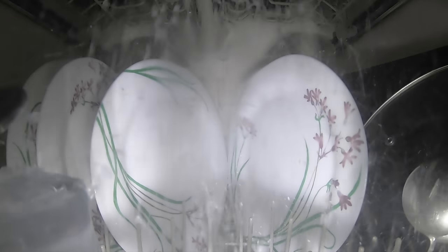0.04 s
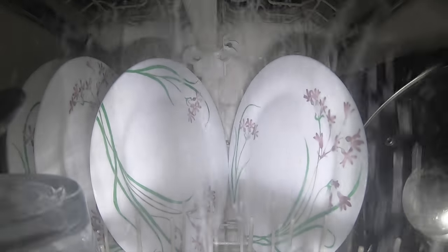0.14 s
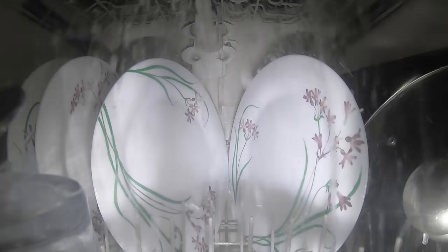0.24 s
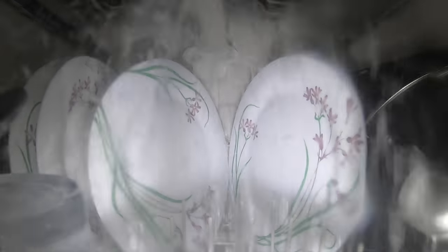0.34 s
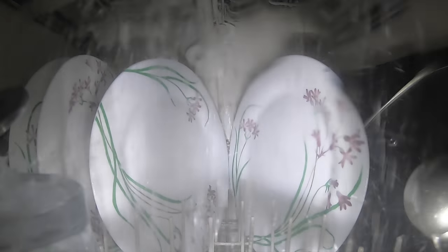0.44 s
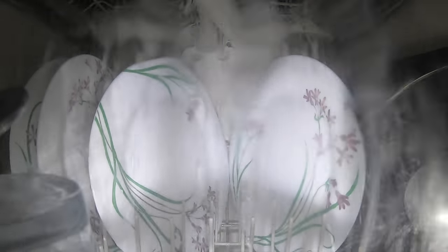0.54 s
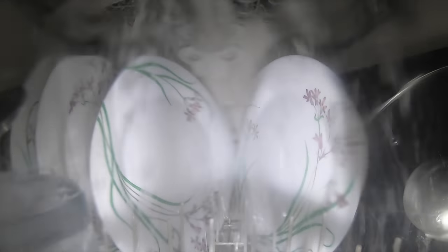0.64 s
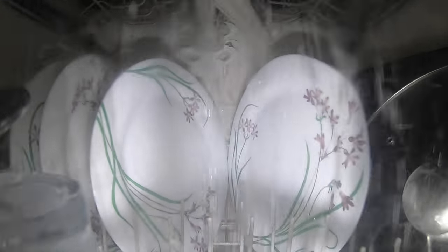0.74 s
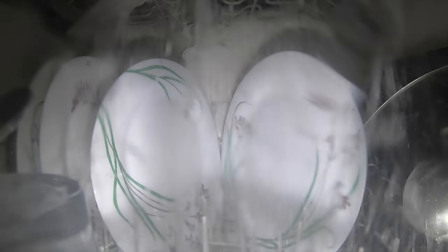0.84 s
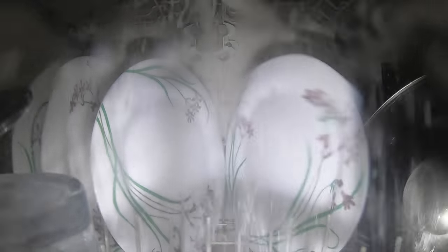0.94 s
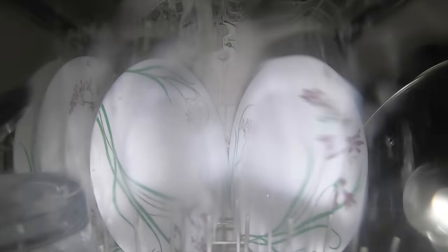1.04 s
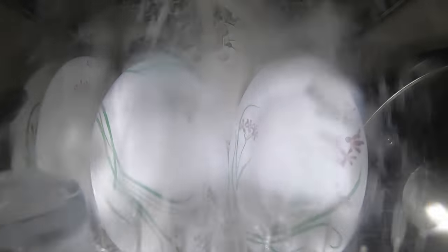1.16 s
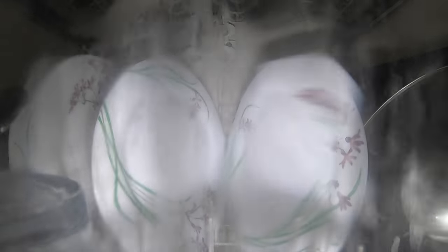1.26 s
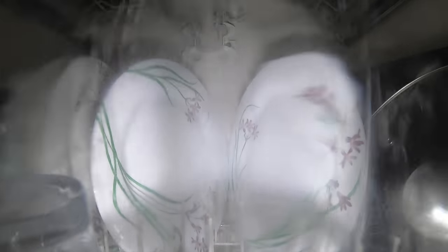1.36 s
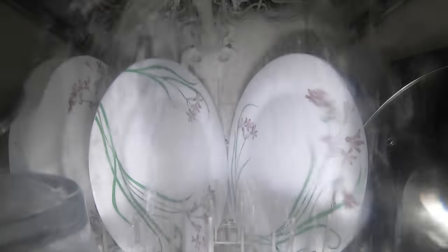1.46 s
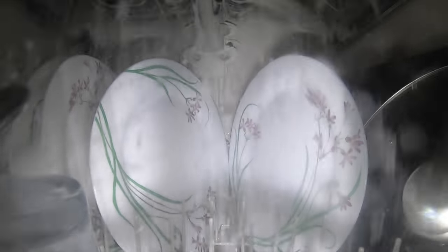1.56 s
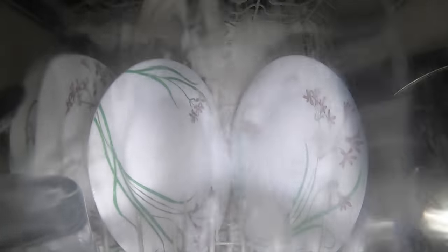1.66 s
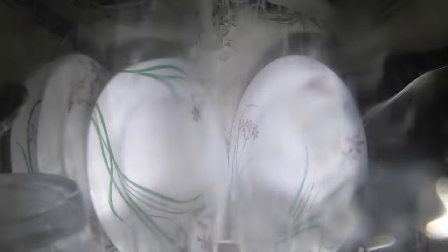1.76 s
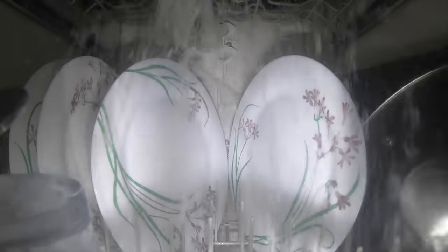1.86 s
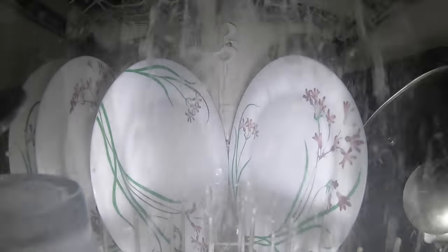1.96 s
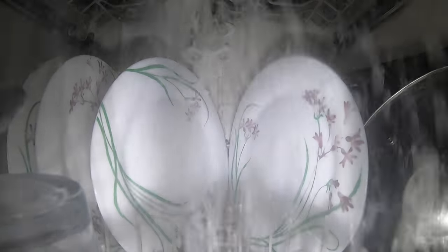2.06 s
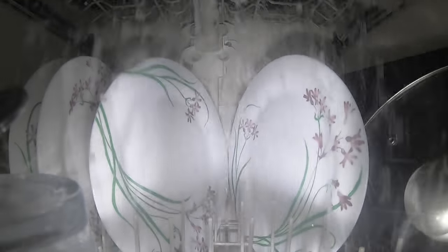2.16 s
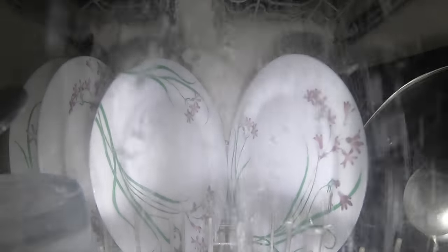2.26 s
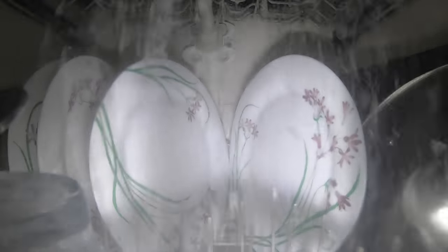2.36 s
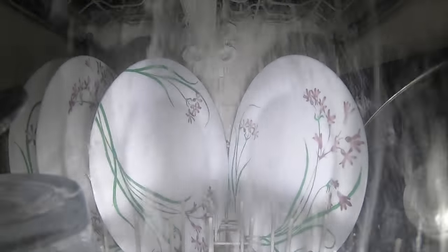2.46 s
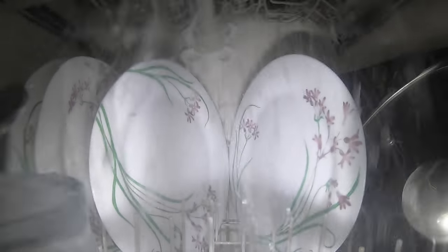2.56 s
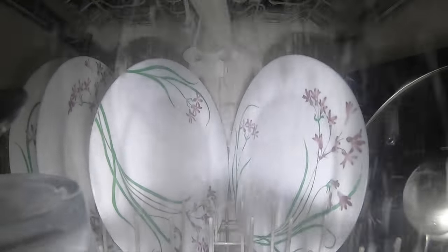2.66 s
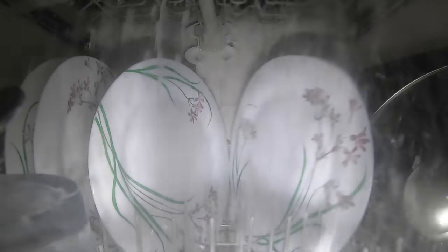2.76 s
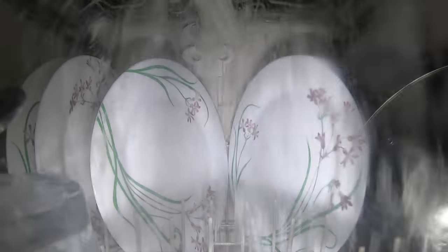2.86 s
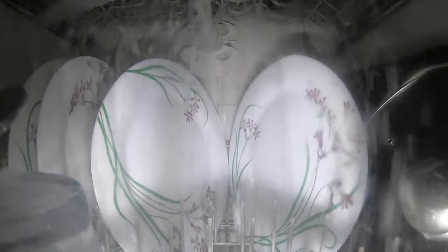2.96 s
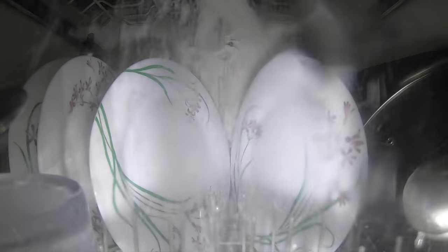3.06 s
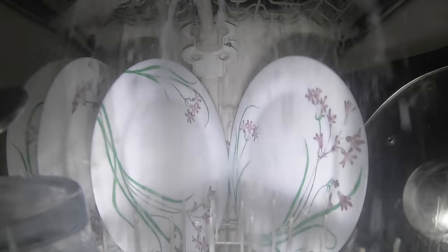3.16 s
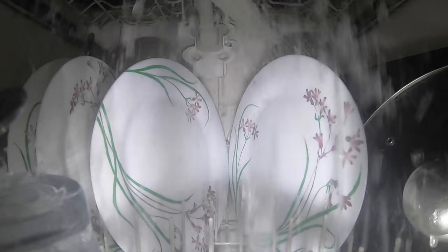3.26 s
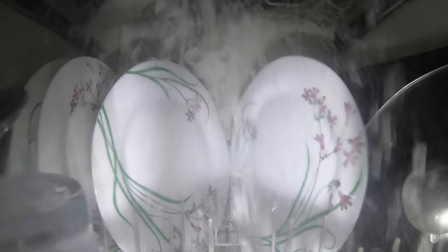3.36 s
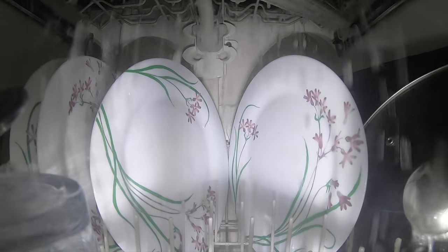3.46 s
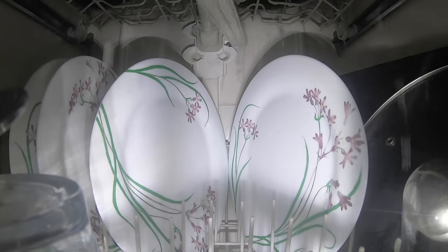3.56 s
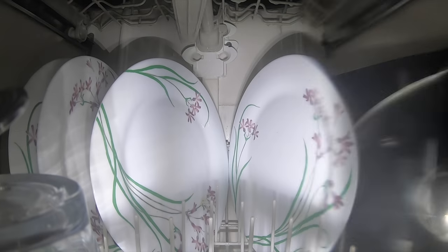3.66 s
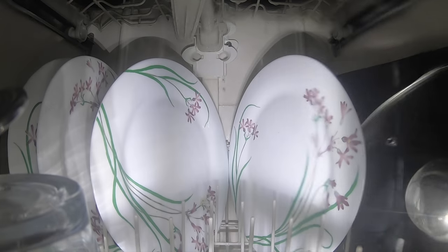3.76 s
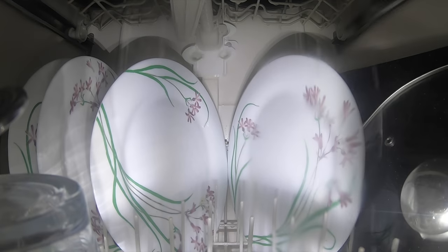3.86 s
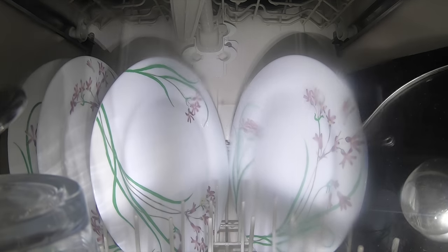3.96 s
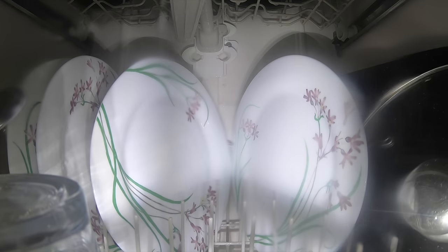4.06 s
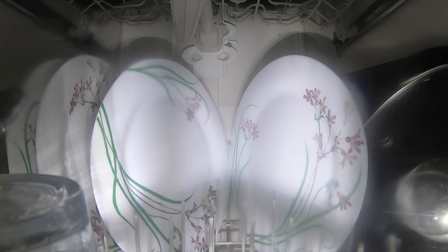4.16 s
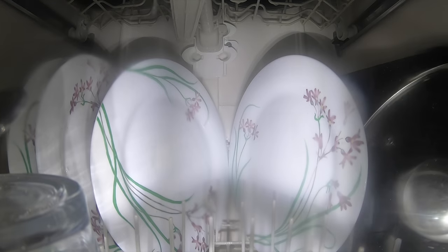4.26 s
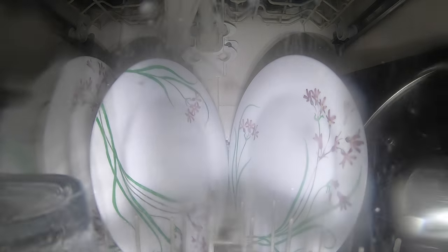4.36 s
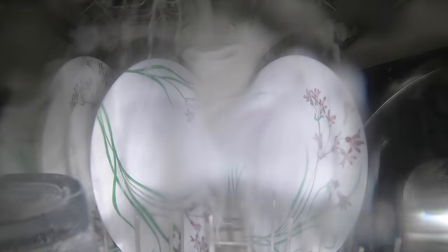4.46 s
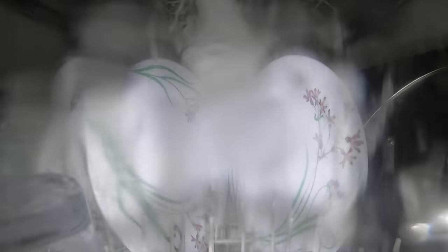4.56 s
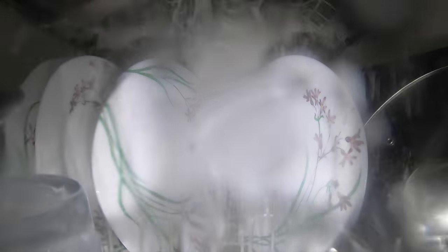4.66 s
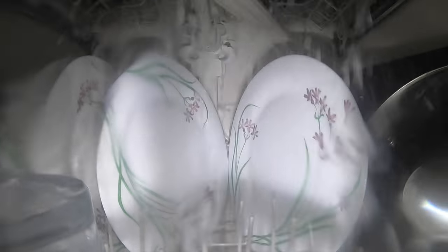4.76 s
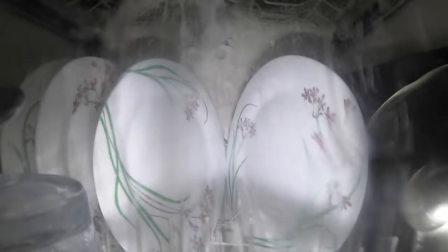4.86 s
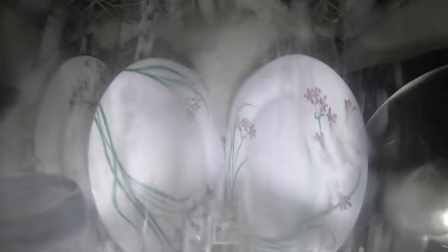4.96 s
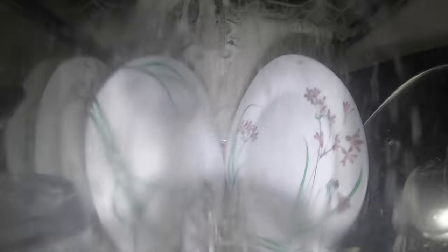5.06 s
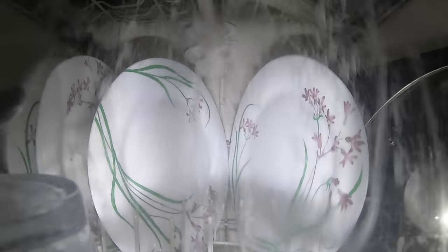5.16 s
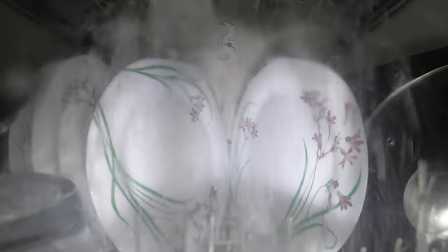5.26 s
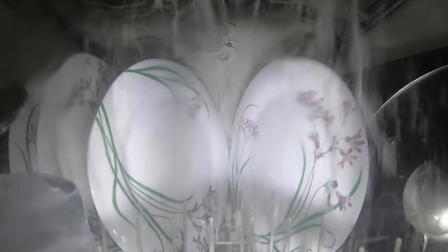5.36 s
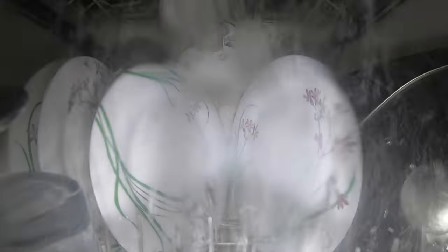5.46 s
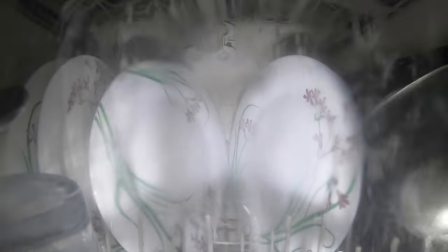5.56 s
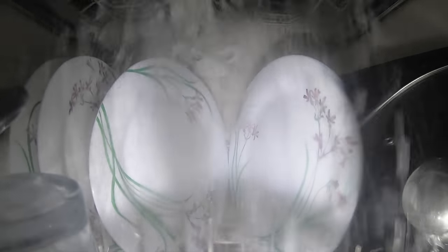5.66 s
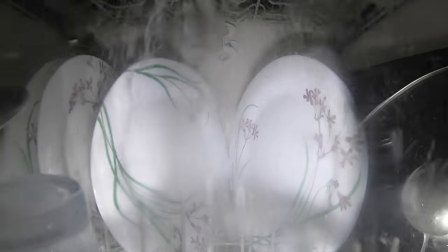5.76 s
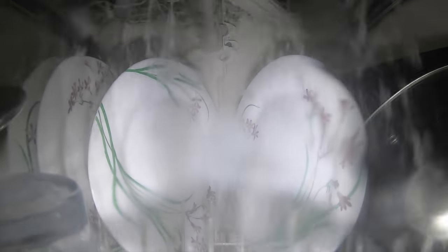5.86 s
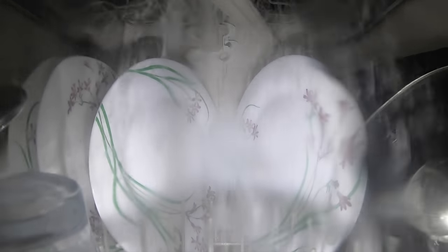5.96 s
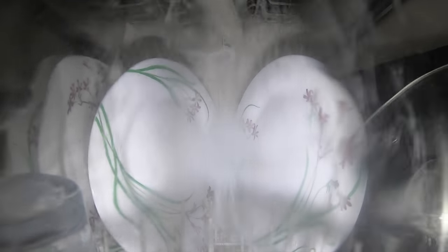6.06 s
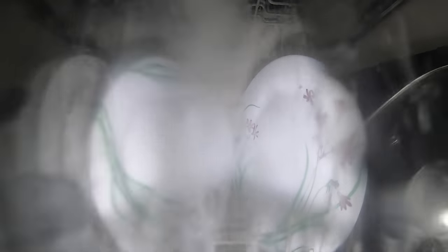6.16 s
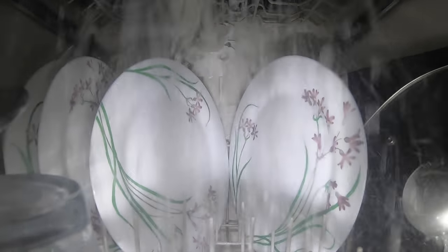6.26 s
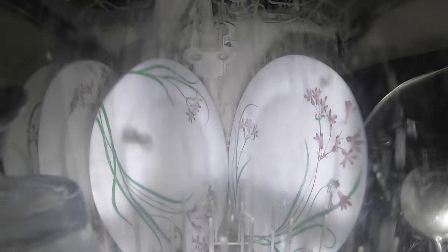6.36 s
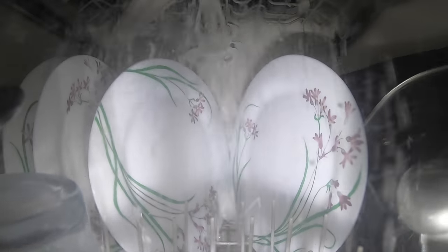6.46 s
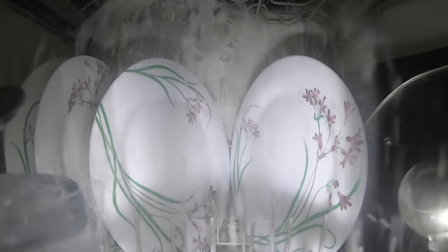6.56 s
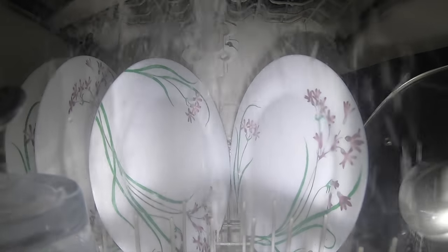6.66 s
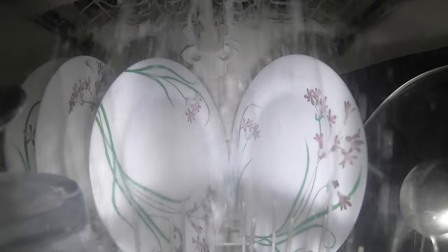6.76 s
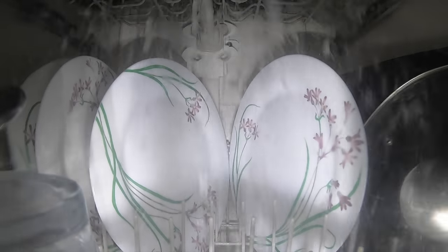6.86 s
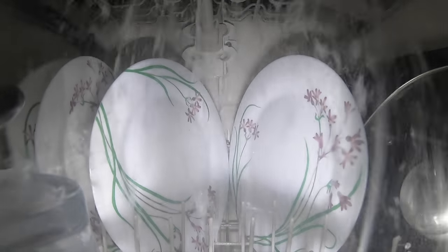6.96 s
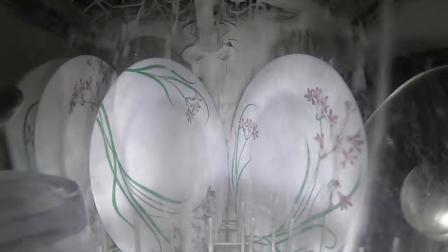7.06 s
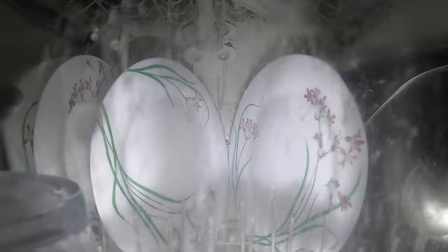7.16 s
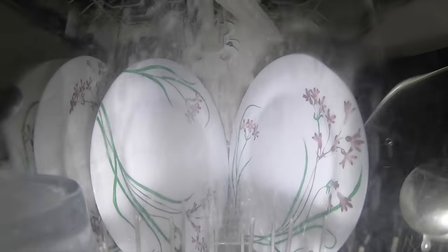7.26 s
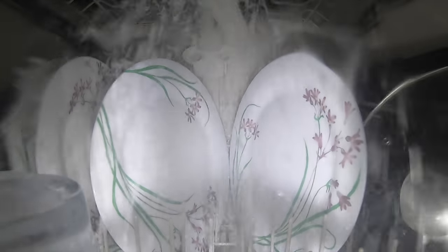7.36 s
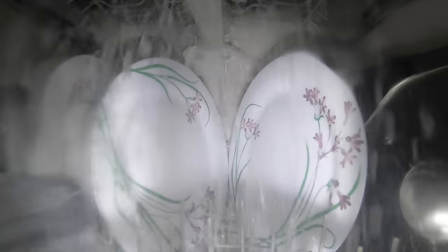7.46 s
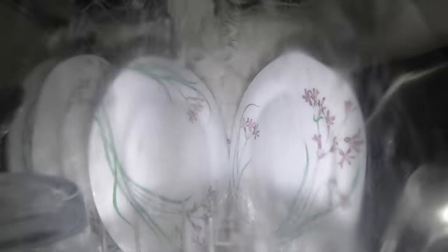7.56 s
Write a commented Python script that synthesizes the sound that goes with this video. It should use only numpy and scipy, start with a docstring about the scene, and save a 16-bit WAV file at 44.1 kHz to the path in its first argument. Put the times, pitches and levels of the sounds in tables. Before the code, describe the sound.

Dense, wet, very close dishwasher noise: low rumbling wash, irregular thumping jet passes, rattling drops on plates, short hisses and bright clicks on the microphone's case. Midway the pressure drops for most of a second, exposing trickling, small plops and slosh. The jets suddenly return with gulps, ringing drips and a wavering motor hum.

```python
"""Jets of water boom, drum and hiss past at once, inside a running dishwasher.
The microphone is sealed in a waterproof case among the plates, so jets and drops strike it at no distance.
Turning spray arms sweep jets over tub, dishes and case: shaped random impacts boom, drum and hiss.
Short swelling tones, bursts of noise and clicks make the low thuds, gulps, drops, slaps and snaps.
The pressure fails for most of a second, leaving drips and sloshing, then returns with the pump's hum."""
import sys
import numpy as np
from scipy import signal
from scipy.fft import rfft, irfft
from scipy.io import wavfile
from scipy.ndimage import uniform_filter1d

SR = 44100
rng = np.random.default_rng(int(sys.argv[2]) if len(sys.argv) > 2 else 0)


def output_pcm(signal):
    """Save a mono or channel-first signal as 16-bit PCM at the path in sys.argv[1].

    Samples are clipped to [-1, 1] before scaling.
    """
    pcm = np.clip(np.atleast_2d(signal).T, -1, 1) * 32767
    wavfile.write(sys.argv[1], SR, np.round(pcm).astype(np.int16))


N = 335601


def from_db(db):
    """Decibels to gain."""
    return 10 ** (np.asarray(db) / 20)


def rms_one(x):
    """Scale to unit power."""
    return x / np.sqrt(np.mean(x ** 2) + 1e-20)


def in_time(rows):
    """Interpolate each column of a curve, whose first column is t/s, at every sample."""
    times, *columns = np.transpose(rows)
    return [np.interp(np.arange(N) / SR, times, column) for column in columns]


def add(track, s, sound):
    """Mix a sound into a track at time s, in seconds."""
    at = max(0, round(s * SR))
    track[at:at + len(sound)] += sound[:N - at]


def drift(rate_hz):
    """Slow random wander of spread 1: noise through two equal low-pass poles at rate_hz."""
    step = 40   # samples between points of the slow curve
    r = np.exp(-2 * np.pi * rate_hz * step / SR)
    noise = rng.standard_normal(N // step + 2002)
    slow = signal.lfilter([1], [1, -2 * r, r * r], noise)[2000:]   # drop the filter's start-up
    return np.interp(np.arange(N) / step, np.arange(len(slow)), rms_one(slow))


def colour(x, spectrum):
    """Causal (minimum-phase) filter with the given spectrum; white noise keeps its power."""
    size = 8192
    hz, db = np.transpose(spectrum)
    grid = np.maximum(np.arange(size // 2 + 1) * SR / size, 1)
    gain = from_db(np.interp(np.log(grid), np.log(hz), db))
    cepstrum = irfft(np.log(gain))
    cepstrum[1:size // 2] *= 2   # fold the cepstrum forward in time for minimum phase
    cepstrum[size // 2 + 1:] = 0
    response = irfft(np.exp(rfft(cepstrum)))
    return signal.fftconvolve(x, response / np.linalg.norm(response))[:N]


def resonate(x, hz, width):
    """One resonance of the given width in Hz, gain 1 on top."""
    r = np.exp(-np.pi * width / SR)
    zeros = np.array([1, 0, -1]) * (1 - r * r) / 2
    poles = [1, -2 * r * np.cos(2 * np.pi * hz / SR), r * r]
    return signal.lfilter(zeros, poles, x + 1e-18)


def wandering(x, hz, width):
    """A resonance whose pitch wanders as water loads the dish and runs off."""
    pitch = hz * (1 + 0.023 * drift(8.5))
    turn = np.exp(2j * np.pi * np.cumsum(pitch) / SR)
    r = np.exp(-np.pi * width / SR)
    return 2 * np.real(turn * signal.lfilter([1 - r], [1, -r], x / turn))


# Resonances of case and crockery, also played by drumming: f/Hz, width/Hz, lift/dB
RESONANCES = [(1006, 73, 12), (1431, 128, 14.5), (2026, 148, 15)]


def crockery(x):
    """Case and plates ring briefly after each impact."""
    return x + sum((from_db(db) - 1) * resonate(x, hz, width) for hz, width, db in RESONANCES)


def impacts(per_s, spread_db):
    """Random drops, many small and a few large; unit power."""
    sizes = from_db(spread_db * np.minimum(rng.exponential(1, N), 4.5))
    signed = sizes * rng.choice([-1, 1], N)
    return rms_one(signed * (rng.random(N) < per_s / SR))


def steadied(x, span):
    """Many drops average out: even power over each span in seconds, with the fast grain kept."""
    power = uniform_filter1d(x * x, max(2, int(span * SR)))
    return x / np.sqrt(np.abs(power) + 1e-9)


SWELL_RISE = 0.0083   # share by which the pitch lies higher, averaged over the swell


def bubble(hz, cycles):
    """A tone, as of trapped air, swells for some cycles, then dies away as its pitch rises."""
    age = np.arange(0, 10, hz / cycles / SR)   # in swell times
    return np.sin(2 * np.pi * cycles * age * (1 + SWELL_RISE * age)) * age * np.exp(1 - age)


def bubbling(low_hz, high_hz, cycles, spread_db, count):
    """Bubbles of random size and pitch at random times; unit power."""
    out = np.zeros(N)
    for when, pitch, size in rng.random((count, 3)):
        hz = low_hz * (high_hz / low_hz) ** pitch
        add(out, when * (N - 1) / SR, from_db(spread_db * size ** 2) * bubble(hz, cycles))
    return rms_one(out)


SWEEP_ATTACK_S, SWEEP_RELEASE_S = 0.0097, 0.017
FAN_AHEAD_S, FAN_BEHIND_S = 0.054, 0.15   # stray water fans out ahead of a jet and behind it


def sweep(t, dwell, release_s, fan_db):
    """Power of one jet's pass, t seconds after arrival: it dwells and leaves, in a fan of stray water."""
    early, late = np.maximum(-t, 0), np.maximum(t - dwell, 0)
    core = np.clip(t / SWEEP_ATTACK_S, 0, 1) * np.exp(-np.minimum(late / release_s, 20))
    fan = from_db(fan_db) * np.exp(-early / FAN_AHEAD_S - late / FAN_BEHIND_S)
    return core ** 2 + fan ** 2


PANEL_FAN_DB, DRUM_FAN_DB = -6.5, -6   # level of the fan against the jet
MIST_FAN_DB = -13   # the fine spray stays closer to the jet
PANEL_LAG_S, PANEL_RELEASE_S = 0.0015, 0.048   # the heavy water lands later and the panels boom on
# Jets sweeping over dishes and case, levels before the pressure acts:
# t/s, dwell/s, panel boom level/dB, drumming level/dB, fine spray level/dB
SWEEPS = [(0.0, 0.04, -32, -34, -42), (0.049, 0.029, -23.5, -27.5, -33), (0.492, 0.07, -27, -34.5, -43.5),
          (.905, 0.086, -29, -38, -54), (1.034, 0.034, -30.5, -38, -63), (1.33, .12, -26, -31, -41.5),
          (1.753, 0.053, -25, -32, -34), (1.865, 0.047, -29.5, -31, -39.5), (2.261, 0.053, -29.5, -30, -35),
          (2.68, .13, -32.5, -37.5, -44), (3.084, 0.051, -28, -33, -33), (3.179, 0.077, -29.5, -33, -41),
          (3.39, 0.063, -29.5, -53, -43), (4.407, 0.061, -37.5, -42, -41), (4.719, 0.084, -30, -32, -33.5),
          (4.828, 0.037, -27, -30.5, -37.5), (5.234, 0.067, -30.5, -32.5, -34.5),
          (5.686, 0.11, -31, -36.5, -47), (6.26, 0.053, -25.5, -26.5, -40),
          (6.93, 0.042, -36.5, -42, -38.5), (7.016, 0.097, -29.5, -29.5, -35.5),
          (7.125, 0.051, -28, -35, -50), (7.297, 0.029, -30, -56, -37.5)]


def sweep_powers():
    """Power that all the passes together put into the panels, the drumming and the fine spray."""
    t = np.arange(0, N, 20) / SR
    boom = drum = spray = 0
    for s, dwell, boom_db, drum_db, spray_db in SWEEPS:
        on_panels = sweep(t - s - PANEL_LAG_S, dwell, PANEL_RELEASE_S, PANEL_FAN_DB)
        on_dishes = sweep(t - s, dwell, SWEEP_RELEASE_S, DRUM_FAN_DB)
        in_mist = sweep(t - s, dwell, SWEEP_RELEASE_S, MIST_FAN_DB)
        boom = boom + from_db(boom_db) ** 2 * on_panels
        drum = drum + from_db(drum_db) ** 2 * on_dishes
        spray = spray + from_db(spray_db) ** 2 * in_mist
    return in_time(np.transpose([t, boom, drum, spray]))


# Colour of the wall panels under a jet: f/Hz, relative level/dB (per Hz)
PANELS = [(20, -22), (35, -24), (55, -3.5), (80, 11), (105, 3), (145, -3), (190, -1), (225, -6.5),
          (285, 1.5), (350, -10), (450, -28.5), (900, -66)]


def panels(gush):
    """A jet thuds on the wall panels and makes them boom."""
    thuds = impacts(per_s=700, spread_db=3.5) * from_db(4.0 * gush)
    return steadied(colour(thuds, PANELS), span=0.071)


# Colour of the drumming on the plates, also of the dripping patter: f/Hz, relative level/dB (per Hz)
DRUM = [(250, -4.5), (420, 3.5), (700, 0.5), (850, -7), (1200, -7), (1750, -2.5), (2200, -11.5),
        (2550, -10), (3050, -21.5), (3700, -18), (4500, -7.5), (6000, -56), (9000, -34), (15000, -63)]


def drumming(gush):
    """Clumps of drops drum on the plates; now one dish rings and now another, and bubbles gurgle."""
    clumps = from_db(1.78 * gush)
    drops = colour(impacts(per_s=1200, spread_db=2.0) * clumps, DRUM)
    dishes = np.zeros(N)
    for hz, width, db in RESONANCES:
        lift = from_db(db + 1.63 * drift(5.4)) - 1
        dishes += lift * wandering(drops, hz, width)
    bubbles = clumps * bubbling(low_hz=640, high_hz=2182, cycles=4.06, spread_db=13, count=800)
    return steadied(rms_one(drops + dishes) + from_db(-9.0) * rms_one(bubbles), span=0.14)


# Colour of the fine spray, also of the bursting clumps: f/Hz, relative level/dB (per Hz)
SPRAY = [(2500, -24), (3500, -20), (4200, -5.5), (4750, 4.5), (5300, 3.5), (5950, -5.5), (6700, -5.5),
         (7300, -11), (8300, -9.5), (9000, -20.5), (10300, -27.5), (12500, -39), (16000, -95)]


def fine_spray(gush):
    """A hiss of droplets, with tiny bubbles pinging in it."""
    mist = impacts(per_s=5500, spread_db=2.0)
    pitches = np.geomspace(3000, 8800, num=28)
    pings = sum(resonate(impacts(per_s=15, spread_db=3.5), hz, hz / 28) for hz in pitches)
    flicker = from_db(0.95 * gush + 1.9 * drift(15))
    fizz = (mist + from_db(-10) * rms_one(pings)) * flicker
    return steadied(crockery(colour(fizz, SPRAY)), span=0.17)


# Colour of the water thudding on the tub: f/Hz, relative level/dB (per Hz)
TUB = [(18, -13.5), (35, 8), (53, -4), (76, 3.5), (110, 1), (150, -4.5), (225, -4.5), (295, -4), (350, -14),
       (450, -20.5), (900, -77)]


def tub(gush, rumble_db):
    """Sheets of water thud on the walls and air glugs in the sump; only heavy flow booms the panels."""
    thuds = rms_one(colour(impacts(per_s=700, spread_db=1.5) * from_db(0.98 * gush), TUB))
    glugs = bubbling(low_hz=88.7, high_hz=343, cycles=1.69, spread_db=11, count=110)
    boom = signal.sosfilt(signal.butter(1, 110, fs=SR, output="sos"), thuds)
    light = np.clip((-36 - rumble_db) / 6, 0, 1)   # grows as the flow weakens and the water only sloshes
    wash = thuds - light * boom + from_db(-6.5) * (1 - light) * glugs
    return from_db(rumble_db) * steadied(wash, span=0.27)


# Falling splashes that slap the case, level before its ring: t/s, level/dB, length/s
SLAPS = [(0.503, -31, 0.0045), (1.174, -35.5, 0.0045), (1.753, -30.5, 0.017), (1.821, -29.5, 0.0074),
         (2.265, -33, 0.0072), (3.217, -33, 0.01), (3.604, -36, 0.0055), (3.685, -33, 0.0014),
         (3.784, -41.5, 0.0065), (3.806, -53, 0.002), (4.093, -44, 0.0021), (4.301, -39, 0.0028),
         (4.391, -54, 0.0022), (4.41, -39, 0.0084), (4.719, -29, 0.0074), (5.195, -33.5, 0.0042),
         (5.232, -31, 0.02), (5.66, -33, 0.0047), (5.716, -31.5, 0.0047), (6.957, -35, 0.0049)]
# Colour of a blow on the case, also in spatter, snaps and ticks: f/Hz, relative level/dB (per Hz)
CASE = [(150, -13), (500, 7), (1100, 7), (2200, 2), (3100, -5.5), (4000, -0.5), (5000, 7.5), (6000, -2),
        (8300, -9), (9500, -38.5), (12000, -26), (16000, -35)]


def slaps():
    """Water crossing the case is a tight burst of hard drops that dies quickly."""
    push, t = np.zeros(N), np.arange(SR // 8) / SR
    attack = np.minimum(t / .001, 1)
    for s, db, length in SLAPS:
        add(push, s, from_db(db) * attack * np.exp(-np.maximum(t - length, 0) / 0.00089))
    burst = steadied(impacts(per_s=16000, spread_db=4.0), span=0.0037)
    return crockery(colour(push * burst, CASE))


SPLAT_S = 0.0011   # half-width of a burst; decay time of a stray drop as it spreads
# Clumps of droplets bursting on the case, level before colouring: t/s, level/dB
SPLATS = [(.07, -18), (0.27, -24.5), (.532, -25), (1.332, -22.5), (1.897, -33), (2.23, -24), (2.83, -21),
          (3.101, -24), (3.257, -35), (3.562, -16.5), (3.85, -48), (3.917, -38.5), (3.985, -37.5),
          (4.753, -20), (4.797, -21), (5.246, -30), (5.737, -27), (6.094, -33), (6.279, -30), (7.027, -18),
          (7.05, -20), (7.485, -26), (7.54, -15)]


def splats():
    """A clump of droplets bursts on the case in milliseconds, coloured as spray with a sharp edge."""
    push, t = np.zeros(N), np.arange(N) / SR
    for s, db in SPLATS:
        push += from_db(db) / (1 + ((t - s) / SPLAT_S) ** 2)
    burst = push * rng.standard_normal(N)
    edge = signal.sosfilt(signal.butter(4, [6000, 8700], "band", fs=SR, output="sos"), burst)
    return from_db(-4.0) * colour(burst, SPRAY) + from_db(-1.0) * edge


DROP_SWELL_S = .0012   # time a drop's ring takes to swell
# Fat drops that trap a ringing bubble, peak before a 6 dB cut, the splash and the low-pass:
# t/s, peak level/dB, f/Hz
DROPS = [(0.621, -21.5, 5060), (0.813, -28, 2590), (0.815, -30, 3280), (1.756, -20, 6930),
         (1.882, -19, 4400), (1.969, -28, 7740), (2.342, -16, 5180), (3.833, -30, 2030), (3.918, -26, 1920),
         (4.794, -10.5, 5100), (4.921, -14.5, 5300), (5.242, -12.5, 990), (5.246, -10.5, 6900),
         (6.306, -14.5, 1400), (7.097, -14.5, 5070)]


def fat_drops():
    """Each drop traps a bubble that rings at its own pitch, with a short splash around that pitch."""
    out = np.zeros(N)
    for s, db, hz in DROPS:
        ring = bubble(hz, hz * DROP_SWELL_S)
        noise = rms_one(resonate(rng.standard_normal(len(ring)), hz, hz / 2))
        splash = noise * np.abs(signal.hilbert(ring))   # follows the ring's envelope
        add(out, s, from_db(db - 6.0) * (ring + splash / 2))
    return signal.sosfilt(signal.butter(4, 9000, fs=SR, output="sos"), out)


SNAP_DB = -23   # click level before filtering
# Tiny hard snaps right at the microphone, all equally loud: t/s
SNAPS = [0.2435, 0.445, 1.038, 1.4335, 1.8301, 2.2292, 2.4228, 2.821, 3.217, 3.41, 5.196, 5.797]


def snaps():
    """Single bright clicks with no ring, each with a stronger knock of the case."""
    clicks = np.zeros(N)
    for s in SNAPS:
        add(clicks, s, from_db([SNAP_DB]))
    bright = signal.sosfilt(signal.butter(1, 2500, "high", fs=SR, output="sos"), clicks)
    return bright + from_db(4.5) * colour(clicks, CASE)


# Low thuds and gulps in the water: t/s, peak level/dB (nominal), f/Hz
THUDS_AND_GULPS = [(1.012, -19.5, 305), (1.366, -20.5, 286), (1.884, -19.5, 253), (4.85, -24, 258),
                   (5.261, -21.5, 113.7), (5.799, -22, 94), (6.319, -21, 241), (6.768, -20, 298),
                   (6.792, -20.5, 296), (7.25, -21.5, 266)]


def thuds_and_gulps():
    """Each low thud or gulp is a tone that swells, rises a little in pitch and dies in a few cycles."""
    out = np.zeros(N)
    for s, db, hz in THUDS_AND_GULPS:
        add(out, s, from_db(db) * bubble(hz, cycles=1.26))
    return out


# Thin jets that each ring one dish, level before the fades: t/s, length/s, level/dB, f/Hz
GURGLES = [(.37, 0.056, -35, 1960), (0.884, 0.058, -37.5, 1950), (6.922, 0.037, -34.5, 1920),
           (7.555, 0.059, -43, 1440)]


def gurgles():
    """A thin jet plays briefly on one dish and makes it ring."""
    out = np.zeros(N)
    for s, length, db, hz in GURGLES:
        jet = rng.standard_normal(SR // 8)[:int(length * SR)]
        ring = resonate(resonate(jet, hz, hz / 6), hz, hz / 6)
        add(out, s, from_db(db) * rms_one(ring) * signal.windows.tukey(len(ring)))
    return out


SPRAY_DB = -44.5   # steady fine spray between the sweeps at 0 dB pressure
SPATTER_PER_S, SPATTER_DB, SPATTER_FOLLOWS = 42, -51.5, 1   # last: share of the spray's swing


def spatter(spray_gain):
    """Stray drops splat on case and plates at random, harder when a jet is near."""
    swing_db = 20 * np.log10(spray_gain) - SPRAY_DB
    r = np.exp(-1 / (SPLAT_S * SR))
    hits = np.abs(impacts(per_s=SPATTER_PER_S, spread_db=3.5))
    spreading = signal.lfilter([1], [1, -r], hits + 1e-18)
    stray = crockery(colour(spreading * rng.standard_normal(N), CASE))
    return from_db(SPATTER_DB + SPATTER_FOLLOWS * swing_db) * rms_one(stray)


PUMP_HZ = 118.9   # mean pitch
# Wash pump, peak of its hum before the waver: t/s, level/dB
PUMP = [(3.5, -44), (3.7, -52), (4.4, -47), (4.5, -28), (5.3, -34.5), (6.2, -35.5), (7.6, -41.5)]


def pump():
    """The pump's hum, a sine, wavers in pitch and level with its load."""
    level_db, = in_time(PUMP)
    turns = np.cumsum(PUMP_HZ * (1 + .028 * drift(4.51))) / SR
    return from_db(level_db + 2.0 * drift(20.0)) * np.sin(2 * np.pi * turns)


def dripping():
    """Water trickles off the racks all the time, in uneven runs of patter, fine ticks and small plops."""
    patter = crockery(colour(impacts(per_s=200, spread_db=7.5), DRUM))
    ticks = crockery(colour(impacts(per_s=60, spread_db=2.5), CASE))
    plops = bubbling(low_hz=1200, high_hz=2400, cycles=2, spread_db=20, count=500)
    trickle = from_db(-65.5) * patter + from_db(-61.5) * ticks + from_db(-60.5) * plops
    return trickle * from_db(2 * drift(28))


# Steady wash between the sweeps at 0 dB pressure, and the share of the pressure each layer follows
RUMBLE_DB, RUMBLE_FOLLOWS = -32.5, 0.64
DRUM_DB, DRUM_FOLLOWS = -45.5, 0.52
SPRAY_FOLLOWS = 1.1
SLOSH_DB = -12   # below this pressure the water still sloshes in the sump
# Pressure at the spray arms, which fails and comes back: t/s, level/dB
PRESSURE = [(0, 2), (3.4, 0), (3.61, -3.5), (3.63, -13), (3.98, -14.5), (4.1, -25.5), (4.401, -21),
            (4.409, 1.5), (7.6, 0.5)]


def scene():
    """A steady wash and the passing jets, driven by the pressure and sharing its sputter, among drops."""
    pressure_db, = in_time(PRESSURE)
    boom, drum, spray = sweep_powers()
    gush = drift(30.0)   # the shared sputter
    rumble_db = RUMBLE_DB + RUMBLE_FOLLOWS * np.maximum(pressure_db, SLOSH_DB)
    boom_gain = np.sqrt(boom) * from_db(pressure_db)
    drum_gain = np.sqrt(from_db(DRUM_DB) ** 2 + drum) * from_db(DRUM_FOLLOWS * pressure_db)
    spray_gain = np.sqrt(from_db(SPRAY_DB) ** 2 + spray) * from_db(SPRAY_FOLLOWS * pressure_db)
    jets = boom_gain * panels(gush) + drum_gain * drumming(gush) + spray_gain * fine_spray(gush)
    water = jets + tub(gush, rumble_db)
    on_case = slaps() + splats() + fat_drops() + snaps() + spatter(spray_gain)
    around = thuds_and_gulps() + gurgles() + pump() + dripping()
    return (water + on_case + around)[None]


CUTOFF_HZ = 15900


def record(dry):
    """The top is cut steeply by an elliptic low-pass."""
    return signal.sosfilt(signal.ellip(10, .1, 80, CUTOFF_HZ, fs=SR, output="sos"), dry)


dry = scene()
out = record(dry)
output_pcm(out)
```